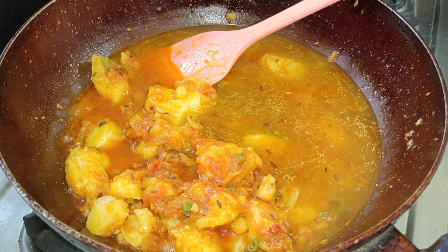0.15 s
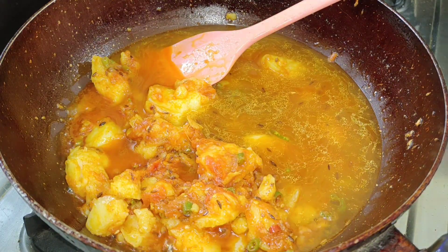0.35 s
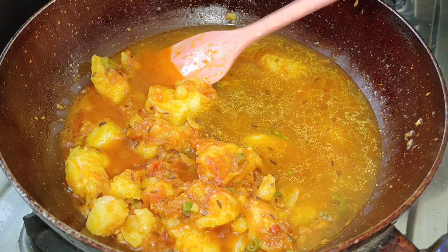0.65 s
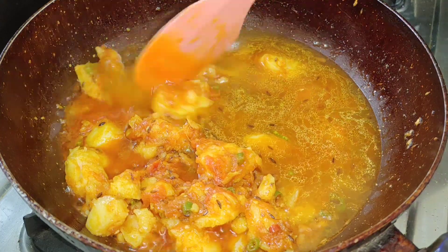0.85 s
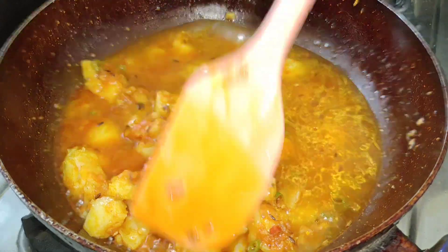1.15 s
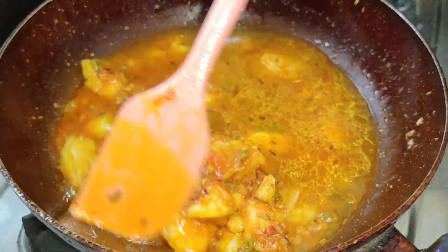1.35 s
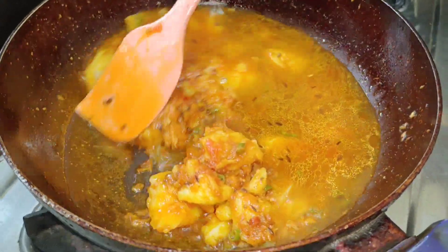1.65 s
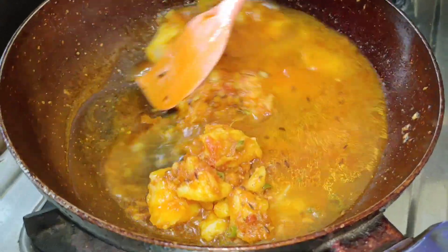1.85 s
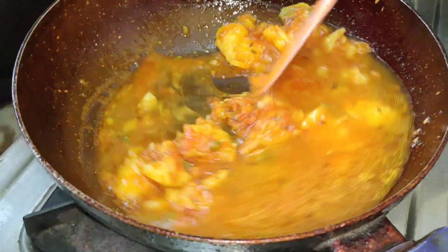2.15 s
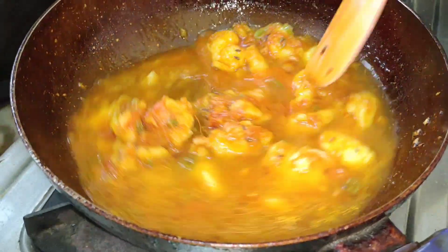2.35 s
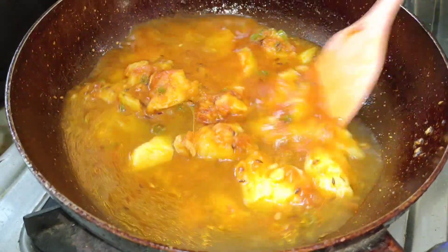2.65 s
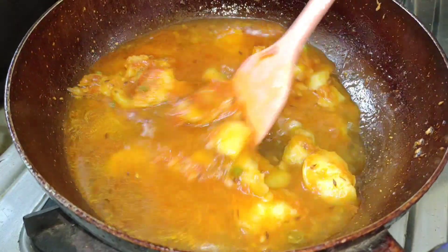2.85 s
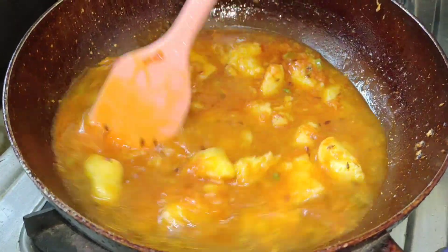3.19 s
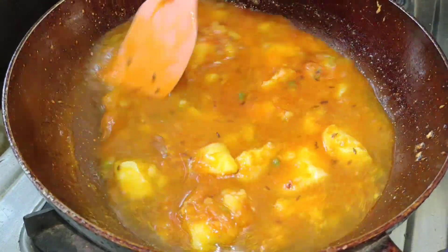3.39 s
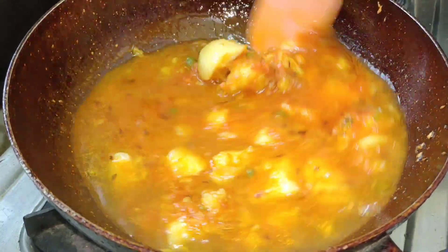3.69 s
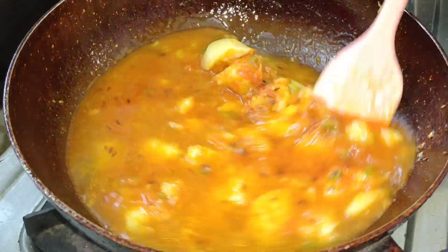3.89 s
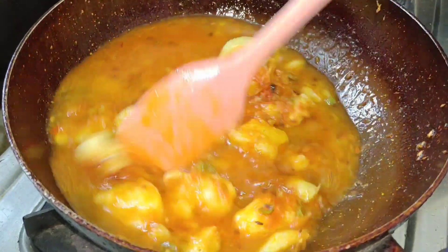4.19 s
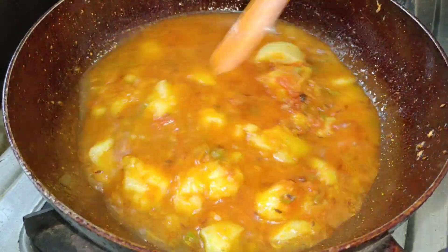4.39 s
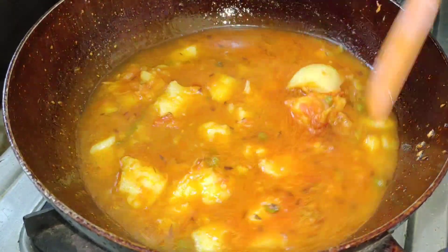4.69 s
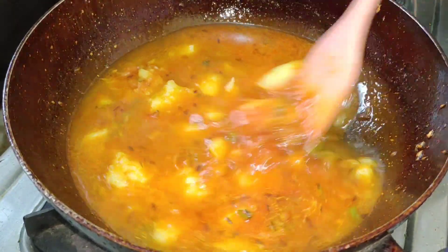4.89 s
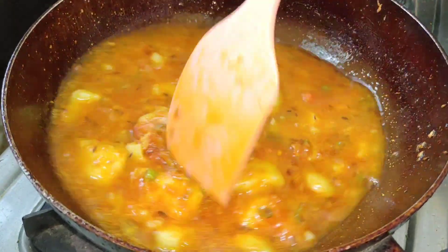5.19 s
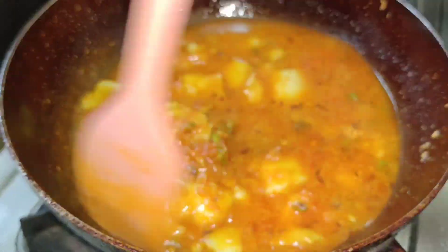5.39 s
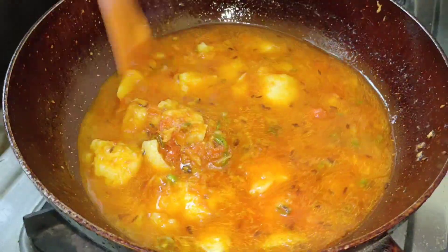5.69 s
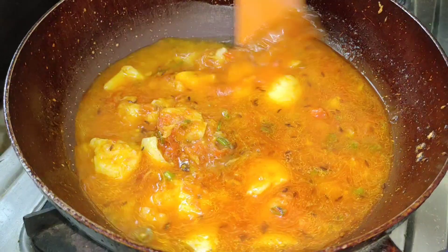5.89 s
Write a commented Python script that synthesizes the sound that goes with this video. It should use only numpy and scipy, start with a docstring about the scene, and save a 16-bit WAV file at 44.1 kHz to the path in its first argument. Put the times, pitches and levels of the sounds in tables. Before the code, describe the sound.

Close stereo sound of thin curry in a steel wok, in a small kitchen with short echoes and a faint steady burner hush. Right at the start a scrape and low thud give way to a cluster of wooden knocks from 0.1 to 0.2 seconds, ringing the bowl briefly. Until about 1.3 seconds the sauce crackles in clumps, with sharp high pops on both sides and small scrapes near 0.7 and 1.0. From 1.35 to 2.2 seconds stirring is strongest: gritty drags, wet sloshes, bright surging hiss, low bowl hums and a light tap near 2.1. It falls away sharply by 2.4 and stays quiet until 3.5. Softer strokes swish around 3.6, 3.9, 4.8 and 5.0, with a burst of high pops near 4.25. After a near-silent dip at 5.2 to 5.5, light scrapes, a faint tap at 5.8 and scattered bubbles close it at 6.

```python
"""A wooden spatula stirs thin curry in a hot steel wok, close to a two-port microphone in a small kitchen.
The blade's knocks ring the wok as fading sines; its scrape and the slosh are gritty noise through the bowl's bands.
Sauce on the hot wall hisses as coloured noise full of tiny bubbles; larger bubbles are short rings with snaps.
Nudges make the bowl hum and the stove thud. Burner and room give a steady hush; wall and room add echoes."""
import sys
import numpy as np
from scipy import signal
from scipy.fft import rfft, irfft, next_fast_len
from scipy.io import wavfile
from scipy.ndimage import uniform_filter1d, map_coordinates

SR = 44100
rng = np.random.default_rng(int(sys.argv[2]) if len(sys.argv) > 2 else 0)


def log_audio(samples):
    """Write samples as a 16-bit WAV file to the path given in sys.argv[1]."""
    # one column per channel
    frames = np.atleast_2d(samples).T
    # limit to full scale, then quantise
    limited = np.clip(frames, -1, 1)
    pcm = np.round(limited * 32767).astype(np.int16)
    wavfile.write(sys.argv[1], SR, pcm)


N = 266364  # length in samples

# Hush of burner and room. Each row: frequency in Hz, relative level per Hz in dB.
AIR_COLOUR = [(25, -46), (50, -10.5), (95, -5.5), (300, -15.5), (1000, -17), (3000, -20.5), (9000, -21.5),
              (13000, -37), (16000, -35)]
# Echoes of bowl wall and room. Each row: frequency in Hz, reflected over direct sound in dB.
ECHO_COLOUR = [(60, -3.5), (300, -5), (1000, -9), (3000, 2), (9000, 3.5), (15000, -1)]
BASS_T60_S, TREBLE_T60_S, CROSSOVER_HZ = 0.092, 0.022, 3000  # time for the echoes to fall by 60 dB
# Where the blade is. Each row: time in seconds, extra path to the left port in ms, left over right in dB.
BLADE_PLACE = [(0, 0.14, -2.5), (1, 0.16, -2.5), (2, 0.15, -1.5), (2.8, 0.21, -1), (3.3, .22, -1),
               (4.5, 0.23, -1), (6.04, 0.24, 0.5)]
TOP_HZ = 15800  # the recorder's band limit

# Sauce on the hot wall. Each row: time in seconds, hiss in dB before a trim, fine spray over hiss in dB.
SIZZLE_LEVELS = [(0, -50.5, -3), (.07, -65, -4), (.12, -54, -3), (.25, -58, -1.5), (.42, -59.5, -2.5),
                 (.48, -61, -1.5), (.65, -59, 0.5), (.69, -46, -3.5), (.74, -55, -5), (.8, -52, -5.5),
                 (.91, -57.5, -4), (1.02, -55.5, 3), (1.08, -53, -8.5), (1.16, -57, -4.5), (1.23, -49, -3),
                 (1.29, -54, -5), (1.4, -48, -6), (1.49, -50, 2.1), (1.56, -43.5, -4.2), (1.63, -50.5, 4.5),
                 (1.72, -52.5, 3), (1.9, -50, 4), (2.05, -44, -1.5), (2.17, -52, 1), (2.29, -54.5, -5),
                 (2.57, -67, 1.5), (2.8, -61.5, 3.5), (2.98, -65.5, 1.5), (3.16, -73.5, -2.5),
                 (3.32, -70, 1), (3.36, -66.5, 5), (3.6, -54.5, 0.5), (3.7, -55.5, -1.5), (3.89, -51, -1.5),
                 (4.02, -56.5, -6.5), (4.19, -64, -2), (4.23, -63.5, 11.5), (4.32, -65, 3.5),
                 (4.44, -70.5, 2.5), (4.53, -67, 2), (4.74, -54, -3), (4.92, -58, -5.5), (5.04, -55, -3),
                 (5.11, -68.5, 1), (5.17, -56, -5), (5.255, -59.5, -8), (5.28, -63, -12), (5.33, -69, -6),
                 (5.37, -79, 1), (5.51, -68.5, -2.5), (5.523, -61.5, -0.5), (5.64, -53.5, -5.5),
                 (5.75, -58, 2.5), (5.91, -65, 6.5), (5.96, -59, 1), (6.04, -66, -1)]
# Colours of the steam, from coarse to fine. Each row: frequency in Hz, relative level per Hz in dB.
HISS_COLOUR = [(1500, -11.5), (2600, -1), (3400, 3.5), (5000, 3.5), (6300, 0), (8000, -43.5)]
SPRAY_COLOUR = [(5000, -21), (6500, -8.5), (8500, -2), (10000, -2.5), (11000, -12), (12500, -37)]
MIST_COLOUR = [(9500, -18.5), (11000, -4.5), (12500, -4.5), (14000, -11), (16000, -7.5)]
STIR_START_S = 1.39  # stirring starts, which ends the first part
MIST_DB, EARLY_MIST_DB = -0.5, -9  # mist over spray, later and in the first part: the top of the hiss is duller at first
RESTING_CLUMPS_DB, CLUMP_RATE = 2.5, 41  # left alone, the sizzle comes in clumps with gaps; knots a second
RESTING_CRACKLE_DB = 1  # left alone, single bubbles stand further out of the steam

# The loudest bubbles. Each row: start in seconds, ring in dB before a trim, ring pitch in Hz,
# left over right in dB before a limit, snap in dB before a trim.
LOUD_POPS = [(0.076, -40, 3720, 0, -62), (0.0907, -27, 9500, 9, -60), (0.114, -26.5, 3760, -2, -56),
             (0.154, -22.5, 5330, 7, -56), (0.1945, -26.5, 5930, 2, -54), (0.2623, -35, 4970, -1, -38.5),
             (0.2655, -44, 6900, 0, -43), (0.3187, -32, 4900, -8, -40), (0.3845, -37, 4800, 8, -41.5),
             (0.4266, -31, 5800, 5, -62), (0.4577, -28, 5040, 6, -52), (0.4872, -35, 3430, 11, -37),
             (0.527, -26, 7660, 1, -60), (0.5546, -21, 8170, -3, -66), (0.5756, -26, 8100, 0, -47),
             (0.6856, -41, 4000, -4.5, -32.5), (0.691, -22, 6000, -3, -47), (0.7133, -26, 5100, -1, -30),
             (0.7731, -26, 3460, -13, -64), (0.785, -36, 3550, -7, -50), (0.793, -30, 3460, -7, -48),
             (0.8035, -23, 3900, 0, -32), (0.8495, -24, 4440, 4, -55), (0.9617, -29, 9350, -10, -65.5),
             (0.9935, -33, 8200, 0, -50), (1.0102, -18.5, 8500, 2, -30.5), (1.0278, -43, 8250, 1, -48),
             (1.0738, -22, 5240, -2, -39), (1.1135, -47, 6140, -9, -42), (1.1595, -37, 5830, -2, -55),
             (1.171, -43, 8500, 0, -56), (1.2003, -20.5, 4370, -3, -42), (1.2196, -35, 4560, 6, -31.5),
             (1.226, -27, 4460, 2, -46), (1.3079, -30.5, 5270, 1, -50), (1.3987, -16.5, 9550, -10.5, -35),
             (1.433, -23, 8450, -2, -48), (1.4825, -19.5, 3270, -2, -50), (1.8118, -20, 5500, -2, -32),
             (1.8475, -20.5, 6930, 3, -32), (1.877, -26, 9500, 0, -28), (1.885, -26, 8950, 3, -35),
             (1.9119, -20, 6300, 3, -43), (1.9864, -45, 4540, 4, -37), (2.0277, -20, 2430, 6.5, -31),
             (2.041, -24, 5860, -4, -31), (2.077, -30, 10000, -4, -41), (2.102, -23, 1800, 5, -44),
             (2.1743, -25, 6470, 1, -31), (2.4239, -25.5, 8700, -13, -53), (2.5421, -27.5, 9700, -11, -48),
             (2.563, -32, 9350, -5, -63), (2.7691, -37, 8300, -7, -40), (3.3568, -32, 7860, -4, -66),
             (3.5843, -34, 8650, -11, -56), (3.8656, -35, 8000, 1, -33), (3.9425, -27, 4280, 3, -46),
             (4.0008, -38.5, 3860, 8, -55), (4.0243, -30, 4260, -1, -38), (4.147, -35, 3980, 1, -47),
             (4.1497, -44, 4070, 2, -35), (4.2105, -31, 8230, -1, -44), (4.2248, -30, 8000, 0, -56),
             (4.232, -36, 8560, -2, -44), (4.2388, -23, 7940, 0, -52), (4.2572, -22, 8000, -1, -40),
             (4.284, -29, 8500, 2, -53), (4.3025, -31, 8300, -8, -42), (4.74, -42, 7500, 0, -55),
             (4.767, -44, 4200, 2, -53), (4.776, -42, 1500, -2, -52), (4.815, -42, 1520, -2, -44),
             (4.8633, -26, 1990, 10, -47), (4.877, -38, 3730, 0, -41), (4.974, -32, 4350, 1, -48),
             (4.9926, -36, 2950, 8, -40), (5.011, -31, 8800, 2, -42), (5.0318, -32, 9000, -11, -39),
             (5.079, -36, 1790, 0, -42), (5.1345, -34, 1960, 3, -42), (5.165, -28, 8300, -2, -35),
             (5.232, -35, 4500, -2, -43), (5.2415, -33, 5040, -9, -54), (5.2512, -31, 7950, 5, -47),
             (5.2704, -42.5, 1410, -3, -46), (5.324, -54, 3800, 5, -51), (5.5223, -34, 5520, -11, -42),
             (5.5408, -46, 3970, 6, -51), (5.543, -42, 8800, -4, -52), (5.5565, -40, 4760, 6, -49),
             (5.5747, -43, 4600, -3, -49), (5.598, -40, 4470, 0, -52), (5.6348, -40, 3300, 2, -36),
             (5.7139, -30, 8950, 2, -50), (5.7389, -30, 8300, 0, -38), (5.754, -26, 8450, 3, -45),
             (5.761, -36, 8600, 5, -44), (5.8105, -33, 1420, -5, -44), (5.9352, -21.5, 9250, -1, -62),
             (5.946, -34.5, 3080, 7, -54), (5.965, -34, 4130, 5, -51), (5.9692, -28, 2360, -8, -35.5),
             (5.981, -34, 2930, -7, -51)]
SMALL_RING_DB, SMALL_SNAP_DB, SMALL_HZ = 16, -6, 6210  # smaller bubbles: offsets from hiss to ring and snap; pitch
FOLLOW_S, FOLLOW_DB = 0.011, -10  # a burst sets off its neighbours: mean wait past 2 ms, usual level under the first

# The wok rocks on the stove. Each row: peak time in seconds, dying away to 1/e in seconds,
# bowl hum in dB, stove thud in dB.
NUDGE_LIST = [(0, 0.028, -69, -52), (.1, 0.068, -66, -55.5), (.17, 0.057, -59.5, -59.5),
              (.8, 0.073, -65.5, -98), (1.1, 0.19, -70.5, -83), (1.2, 0.067, -67, -80),
              (1.36, 0.062, -59.5, -75), (1.471, 0.083, -60.5, -69), (1.55, 0.045, -61, -61),
              (1.61, 0.016, -59, -81), (1.72, 0.05, -66, -86), (1.79, 0.088, -64.5, -93),
              (1.97, 0.042, -68, -96), (2.03, 0.033, -55, -88), (2.1, 0.034, -56, -94),
              (2.5, 0.11, -72, -82), (2.6, 0.045, -71.5, -99), (3.27, 0.045, -82, -96),
              (3.315, 0.071, -67, -86), (3.47, 0.039, -103, -92), (3.7, 0.12, -101, -75),
              (3.84, 0.026, -99, -68), (4.02, 0.038, -94, -75), (4.25, 0.11, -90, -81),
              (4.48, 0.16, -82, -83), (4.75, 0.08, -86, -79), (4.98, 0.14, -74, -69),
              (5.5, 0.023, -88, -71.5), (5.6, 0.044, -96, -71)]
NUDGE_RISE_S = 0.027
REST_HUM_DB, REST_THUD_DB, SWAY_DB, SWAY_WAVERS_DB = -85, -85.5, -94.5, 4
# Resonances, all squared later: lowest bending of the bowl, stove top, stove on its feet.
# Each row: centre in Hz, width in Hz before squaring, level in dB before squaring.
BOWL_HUM = [(302, 18.6, 2.5), (397.5, 25, 3.5), (235, 82, -0.5)]
STOVE_THUD = [(106.9, 10.5, 7), (177, 54, 2.5)]
STOVE_SWAY = [(73.8, 21, 0)]
# Sauce rolling over. Each row: frequency in Hz, relative level per Hz in dB.
GURGLE_COLOUR = [(70, -40), (140, -5.5), (220, 0), (330, 3.5), (450, 3), (560, -13), (900, -38)]
GURGLE_DB, GURGLE_LUMPS_DB = -7, 2.5  # level over the bowl hum; depth of its lumps

# Blade in the bowl. Each row: time in seconds, scrape in dB before a trim, slosh over scrape in dB.
BLADE_LEVELS = [(0, -47.5, -3), (.06, -60.5, -8), (.088, -59, -5), (.092, -52, 8), (.15, -45.5, 4),
                (.24, -54, -1.5), (.42, -59.5, -6), (.48, -55.5, -3), (.64, -57, -3.5), (.7, -51, -6.5),
                (.76, -58, -2.5), (.99, -56.5, -4.5), (1.04, -49.5, -11), (1.16, -57.5, -0.5),
                (1.31, -52, -7), (1.345, -56, 2), (1.41, -46, 0), (1.47, -45, -10.5), (1.59, -52, -1.5),
                (1.74, -51.5, -10.5), (1.8, -46.5, -9.5), (1.93, -52, -8.5), (2.03, -44.5, -10.5),
                (2.085, -47.5, -3), (2.16, -42.5, -24), (2.22, -52.5, -7.5), (2.36, -59, -8),
                (2.45, -65.5, -2), (2.7, -63, -11), (2.83, -59, -7), (2.92, -67.5, -6), (3.28, -71.5, -4.5),
                (3.46, -64, -7), (3.6, -50.5, -9.5), (3.66, -66.5, -3), (3.87, -50, -10.5),
                (4.02, -62, -5.5), (4.22, -75, -6), (4.42, -67.5, -10), (4.47, -63, -2), (4.61, -58.5, -10),
                (4.79, -52.5, -8.5), (4.93, -58.5, -11), (5.02, -47.5, -13), (5.12, -73, 1),
                (5.22, -81, -6), (5.27, -65, -17), (5.35, -80, -20), (5.51, -71.5, -4), (5.57, -63, -9),
                (5.63, -59, -16), (5.68, -55.5, -3.5), (5.75, -52.5, -6), (5.79, -59.5, -3),
                (5.84, -53, -18), (5.91, -64, -34), (5.945, -52.5, -15), (5.97, -50, -25),
                (5.995, -52, -18), (6.04, -56, -32)]
# Bowl under the wet blade: first push along the near wall, water still apart, water mixed in.
# Each row: centre in Hz, width in Hz before sharpening, level in dB before sharpening.
DRAG_NEAR_WALL = [(1175, 67, 2), (1565, 220, 1.5), (1960, 130, 1.2), (2316, 270, 1)]
DRAG_APART = [(1180, 220, -7), (1423, 140, -1.5), (1650, 130, 1.5), (1906, 91, 2), (2400, 220, -2.3)]
DRAG_BLENDED = [(1190, 160, -6.5), (1395, 114, 4.5), (1586, 250, 1.4), (1970, 380, 2), (2280, 330, 1),
                (3020, 310, -8)]
# Bowl under moving sauce: water still apart, water mixed in.
# Each row: centre in Hz, width in Hz before squaring, level in dB before squaring.
SLOSH_APART = [(562, 147, -0.5), (716.5, 78, 4), (821, 88, 2.5), (978, 42, 1.4)]
SLOSH_BLENDED = [(620, 174, -1.2), (809, 107, 2.7), (1003, 116, -1.4)]
DRAG_SHARPNESS = 1.06  # power of the bowl's response: deeper valleys between its bands
TURNING_S = (1.58, 1.59)  # from and to: the blade leaves the near wall and turns round the bowl
MIXING_S = (2.93, 3)  # from and to: the water blends into the curry

# Ringing tones of the steel bowl. Each row: pitch in Hz, level in dB before other factors,
# time to fall by 60 dB in seconds.
WOK_MODES = [(106, -31, 0.33), (294, -11.5, 0.25), (435, -18, 0.57), (584, -20, 0.34), (694, -12, 0.093),
             (722, -6, 0.2), (846, 2, 0.1), (903, -1, 0.29), (1050, -7, 0.24), (1097, -14, 0.28),
             (1220, -17, 0.4), (1350, -17, 0.22), (1423, -16, 0.3), (1654, -4.5, 0.4), (1950, -17, 0.19),
             (2090, -18.5, 0.3), (2060, -33, 0.13), (3340, -9, 0.13), (3414, -20, 0.15),
             (3750, -12.5, 0.084), (5100, -25.5, 0.15), (5900, -12.5, 0.18), (7100, -32, 0.12),
             (8250, -19.5, 0.078), (9660, -12.5, 0.23)]
# Blade on steel. Each row: start in seconds, level in dB before a trim, left over right in dB.
KNOCK_LIST = [(0.090, -19.5, 6), (0.104, -21, 1), (0.132, -27, -5), (0.152, -34, 5), (0.199, -38.5, 9),
              (0.318, -51, 1), (0.487, -51, 4), (0.687, -55, 13), (1.344, -37.5, -1), (2.102, -40.5, 5),
              (5.2715, -65, -3), (5.294, -78, -3), (5.455, -61, 0), (5.806, -44, 2)]
# Sauce in the ringing bowl: knots a second, depth in level and phase; it swallows the tail within SOAK_S.
WAVER_RATE, WAVER_DB, WAVER_RAD, SOAK_S = 63, 1.5, 0.97, 0.12


def amp(db):
    """Turns dB into gain."""
    return 10 ** (np.asarray(db) / 20)


def unit(x):
    """Scales a sound to an rms of 1."""
    return x / np.sqrt(np.mean(x ** 2) + 1e-20)


def along(points, hz):
    """Reads a curve of (Hz, value) points on a log frequency axis."""
    f, v = np.transpose(points)
    return np.interp(np.log(hz + 1), np.log(f + 1), v)


def curves(rows):
    """Draws one value per sample for each column after the time."""
    s, *cols = np.transpose(rows)
    return [np.interp(np.arange(N) / SR, s, c) for c in cols]


def wobble(rate):
    """Makes a smooth random curve with rate knots a second."""
    knots = rng.standard_normal(int(N * rate / SR) + 4)
    return map_coordinates(knots, [np.arange(N) * rate / SR])


def filtered(x, response):
    """Passes x through a response given as a function of frequency."""
    m = next_fast_len(N + SR // 2)
    return irfft(rfft(x, m) * response(np.fft.rfftfreq(m, 1 / SR)), m)[..., :N]


def body(modes):
    """Response of a solid body: a sum of (Hz, width, dB) resonances with alternating signs."""
    def response(f):
        total = 0
        for k, (centre, width, db) in enumerate(modes):
            damping = 1j * f * width
            total = total + (-1) ** k * amp(db) * damping / (centre * centre - f * f + damping)
        return total
    return response


def powered(modes, power):
    """Response of a body with its strength raised to a power, which deepens the valleys between bands."""
    def response(f):
        plain = body(modes)(f)
        return plain * abs(plain) ** (power - 1)
    return response


def steep(modes):
    """Response of a body applied twice, so its bands fall off faster."""
    return lambda f: body(modes)(f) ** 2


def colour(points):
    """Response that follows a curve of (Hz, dB) points."""
    return lambda f: amp(along(points, f))


def gritty(patchy_db, spread):
    """Noise in patches of shifting colour; more spread makes the two ports differ more."""
    z = signal.stft(rng.standard_normal((2, N)), nperseg=512)[2]
    field = rng.standard_normal(z.shape[1:])
    field = uniform_filter1d(field, size=5, axis=0)  # smooth over frequency
    field = uniform_filter1d(field, size=6, axis=1)  # smooth over time
    patchy = signal.istft(z * amp(patchy_db * unit(field)), nperseg=512)[1]
    mid, side = unit(patchy[:, :N])
    return np.array([mid + spread * side, mid - spread * side]) / np.hypot(1, spread)


def placed(s, waves):
    """Adds up short waves, one per row, starting at the times s."""
    k = np.arange(waves.shape[1])
    at = (np.round(s * SR).astype(int)[:, None] + k).ravel()
    return np.bincount(at, waves.ravel(), N + len(k))[:N]


def grains(s, hz, size, cycles, rise):
    """Short sines at times s; rise and fade to 1/e are counted in cycles."""
    phase = hz[:, None] * np.arange(200) / SR
    envelope = np.exp(-phase / cycles) * (1 - np.exp(-phase / rise))
    return placed(s, size[:, None] * np.sin(2 * np.pi * phase) * envelope)


def air():
    """The steady hush of burner and room: coloured noise, alike at both ports in the bass only."""
    mid, other = filtered(rng.standard_normal((2, N)), colour(AIR_COLOUR))
    side = filtered(other, lambda f: f * f / (f * f + 300 ** 2))
    return amp(-71.5) * unit(np.array([mid + side, mid - side]))


def echo_tail(noise, t, t60):
    """Spectrum of a noise echo that dies away by 60 dB in t60 seconds."""
    decay = amp(-60 * t / t60)
    return rfft(noise * decay / np.linalg.norm(decay), 2 * len(t))


def kitchen(x):
    """Echoes of bowl wall and room: fading noise, different at each port and new for each short piece of x."""
    hop = 4096
    count = N // hop + 2
    padded = np.pad(x, ((0, 0), (hop, (count + 1) * hop - N - hop)))
    fade = np.sin(np.pi * np.arange(2 * hop) / (2 * hop))
    pieces = np.array([padded[:, k * hop:(k + 2) * hop] for k in range(count)]) * fade
    t, hz = np.arange(2 * hop) / SR, np.fft.rfftfreq(4 * hop, 1 / SR)
    noise = rng.standard_normal(pieces.shape)
    bass, treble = (echo_tail(noise, t, t60) for t60 in (BASS_T60_S, TREBLE_T60_S))
    apart = hz / (hz + 200)  # long waves reach both ports alike
    bass = (1 - apart) * bass[:, :1] + apart * bass
    low = 1 / (1 + (hz / CROSSOVER_HZ) ** 2)
    echo = (np.sqrt(low) * bass + np.sqrt(1 - low) * treble) * amp(along(ECHO_COLOUR, hz))
    wet = irfft(rfft(pieces, 2 * len(t)) * echo)
    out = np.zeros((2, (count + 4) * hop))
    for k, piece in enumerate(wet):
        out[:, k * hop:(k + 4) * hop] += piece
    return out[:, hop:hop + N]


def ports(x):
    """Sound from the wok travels further to the left port, so it arrives there later."""
    lag_ms, pan_db = curves(BLADE_PLACE)
    left = map_coordinates(x[0], [np.arange(N) - lag_ms * SR / 1000], order=5)
    return np.array([left * amp(pan_db / 2), x[1] * amp(-pan_db / 2)])


def crackle(count, centre_hz, spread, cycles, size_db):
    """Many tiny bursting bubbles as short sines, a few much larger than the rest."""
    u, g = rng.random((count, 2)), rng.standard_normal(count)
    hz = np.clip(centre_hz * np.exp(spread * g), 500, SR / 3)
    size = amp(-size_db * np.log(u[:, 1] + 0.0018))
    return unit(grains(u[:, 0] * N / SR, hz, size, cycles, rise=0.23))


def sauce(slips):
    """Sauce pushed up the hot wall: steam noise with bubbles in it, from coarse hiss to fine mist."""
    hiss_db, fine_db = curves(SIZZLE_LEVELS)
    early = np.arange(N) / SR < STIR_START_S
    mist_db = np.where(early, EARLY_MIST_DB, MIST_DB)
    clumps = unit(amp(RESTING_CLUMPS_DB * early * wobble(CLUMP_RATE)))

    steam = gritty(patchy_db=2.0, spread=0.4) * amp(2.0 * slips)
    bubbles = crackle(count=4000, centre_hz=3840, spread=0.39, cycles=0.84, size_db=3.0)
    coarse = steam + 0.83 * amp(RESTING_CRACKLE_DB * early) * bubbles

    fine_steam = gritty(patchy_db=1.2, spread=1.0) * amp(1.7 * slips)
    fine_bubbles = crackle(count=6000, centre_hz=9330, spread=0.48, cycles=0.53, size_db=3.0)
    fine = fine_steam + 1.13 * fine_bubbles

    hiss = unit(filtered(coarse, colour(HISS_COLOUR)))
    mist = unit(filtered(fine, colour(MIST_COLOUR)))
    spray = unit(filtered(fine, colour(SPRAY_COLOUR))) + amp(mist_db) * mist
    return amp(hiss_db - 5.0) * clumps * (hiss + amp(fine_db) * spray)


def small_pops(count):
    """Smaller bubbles at random moments, following the loudness of the hiss; columns as in LOUD_POPS."""
    s = rng.random(count) * N / SR
    a, b, c, d = rng.standard_normal((count, 4)).T
    hiss_db = curves(SIZZLE_LEVELS)[0][(s * SR).astype(int)]
    hz = np.clip(SMALL_HZ * np.exp(0.435 * b), 2000, 11000)
    ring_db = hiss_db + SMALL_RING_DB + 1.9 * a
    snap_db = hiss_db + SMALL_SNAP_DB + 2.2 * d
    return np.transpose([s, ring_db, hz, 4 * c, snap_db])


def clusters(rows):
    """Each burst sets off three neighbours of like pitch, mostly weaker."""
    after = np.repeat(rows, 3, axis=0)
    u = rng.random(len(after))
    a, b, c = rng.standard_normal((len(after), 3)).T
    s, db, hz, pan_db, snap_db = after.T
    s = np.minimum(s + 0.002 - FOLLOW_S * np.log(1 - u), (N - 1) / SR)
    change_db = FOLLOW_DB + 3 * a
    neighbours = [s, db + change_db, hz * np.exp(0.055 * b), pan_db + 2 * c, snap_db + change_db]
    return np.vstack([rows, np.transpose(neighbours)])


def pops():
    """Larger bubbles, each from its own side: a short ring and a wide snap that also ping the upper steel modes."""
    s, db, hz, pan_db, snap_db = clusters(np.vstack([LOUD_POPS, small_pops(count=260)])).T
    share = amp(np.outer([.5, -.5], np.clip(pan_db, -8, 8)))  # gain at each port
    k = np.arange(96)
    snap = rng.standard_normal((len(s), len(k))) * np.exp(-((k / SR - .0007) / 0.00017) ** 2)
    snap = snap / np.linalg.norm(snap, axis=1, keepdims=True)
    snaps = np.array([placed(s, snap * (g * amp(snap_db + 18.5))[:, None]) for g in share])
    rings = np.array([grains(s, hz, g * amp(db + 5.0), cycles=3.23, rise=6.23) for g in share])
    burst = rings + filtered(snaps, lambda f: (f / (f + 1300)) ** 2 / (1 + (f / 9800) ** 6))
    # a mode that rings longer has a narrower band
    steel = body([(c, np.log(1000) / (np.pi * t60), level) for c, level, t60 in WOK_MODES])
    ping = filtered(burst.mean(axis=0), lambda f: steel(f) * (f > 2100))
    return burst + amp(23.5) * ping


def rocking():
    """Gains of hum and thud: every nudge swells quickly and dies away, over a resting level."""
    s, fall_s, *db = np.transpose(NUDGE_LIST)
    late = np.arange(N) / SR - s[:, None]
    swell = np.exp(-np.where(late < 0, (late / NUDGE_RISE_S) ** 2, late / fall_s[:, None]))
    return amp(db) @ swell + amp([[REST_HUM_DB], [REST_THUD_DB]])


def hum_and_thud():
    """The rocking wok: noise shakes the bowl's lowest modes and the stove, with a gurgle of rolling sauce."""
    shake = rng.standard_normal(N) * amp(1.4 * wobble(30))
    thud, sway = (unit(filtered(shake, steep(modes))) for modes in (STOVE_THUD, STOVE_SWAY))
    hum = unit(filtered(gritty(patchy_db=4.5, spread=0.44), steep(BOWL_HUM)))
    rolling = gritty(patchy_db=2.5, spread=0.3) * amp(GURGLE_LUMPS_DB * wobble(40))
    gurgle = unit(filtered(rolling, colour(GURGLE_COLOUR)))
    hum_gain, thud_gain = rocking()
    sway_gain = amp(SWAY_DB + SWAY_WAVERS_DB * wobble(5.5))
    return hum_gain * (hum + amp(GURGLE_DB) * gurgle) + thud_gain * thud + sway_gain * sway


def blending(x, stages, changes):
    """Passes x through the bowl, whose response crossfades from stage to stage over the spans of change."""
    out = unit(filtered(x, stages[0]))
    for stage, span in zip(stages[1:], changes):
        turn = np.interp(np.arange(N) / SR, span, [0, np.pi / 2])
        out = np.cos(turn) * out + np.sin(turn) * unit(filtered(x, stage))
    return out


def scrape(slips):
    """The blade drags on the steel and pushes sauce: slipping noise through the bands of the bowl."""
    scrape_db, wet_db = curves(BLADE_LEVELS)
    drag_stages = [powered(modes, DRAG_SHARPNESS) for modes in (DRAG_NEAR_WALL, DRAG_APART, DRAG_BLENDED)]
    rubbing = gritty(patchy_db=1.83, spread=0.72) * amp(3.1 * slips)
    drag = blending(rubbing, drag_stages, [TURNING_S, MIXING_S])
    pushing = gritty(patchy_db=3.0, spread=0.062) * amp(3.0 * slips)
    slosh = blending(pushing, [steep(SLOSH_APART), steep(SLOSH_BLENDED)], [MIXING_S])
    return amp(scrape_db - 5.5) * (drag + amp(wet_db) * slosh)


def knocks():
    """Each blow rings the bowl's modes at new strengths; sauce makes them waver and swallows the tail."""
    out, t = np.zeros((2, N + SR)), np.arange(SR // 2) / SR
    hz, level, t60 = np.transpose(WOK_MODES)[:, :, None, None]
    count = len(WOK_MODES)
    place = np.clip(t * WAVER_RATE, 0, 62)
    k, part = place.astype(int), np.sin(np.pi / 2 * (place % 1)) ** 2
    soft_wood = 1 / np.hypot(1, hz / 3600)  # wood is too soft for the top modes
    shape = (1 - np.exp(-t / 0.00067)) * np.exp(-(t / SOAK_S) ** 2 / 2)
    for s, db, pan_db in KNOCK_LIST:
        strength, start = rng.standard_normal((2, count, 1, 1))
        port = rng.standard_normal((count, 1, 1)) * np.array([[1], [-1]])
        knots = rng.standard_normal((2, count, 2, 64))  # each mode wavers in its own way at each port
        size, phase = knots[..., k] * (1 - part) + knots[..., k + 1] * part
        size_db = level + 2.6 * strength + WAVER_DB * size - 60 * t / t60
        drift = WAVER_RAD * phase * np.minimum(t * WAVER_RATE, 1)
        angle = 2 * np.pi * hz * t + 0.36 * start + 0.43 * port + drift
        ring = (amp(size_db) * soft_wood * np.sin(angle)).sum(axis=0)
        gain = amp(db - 15.0 + pan_db * np.array([[.5], [-.5]]))
        out[:, round(s * SR):][:, :len(t)] += gain * ring * shape
    return out[:, :N]


def scene():
    """Everything in the wok, direct and reflected, over the hush; the open-surface bubbles echo least."""
    # the blade catches and lets go, from ticks to lumps
    slips = wobble(700) + 0.73 * wobble(120) + 0.33 * wobble(30)
    wok = sauce(slips) + hum_and_thud() + scrape(slips) + knocks()
    bubbles = pops()
    reflected = kitchen(wok + amp(-9) * bubbles)
    return ports(wok + bubbles + reflected) + air()


def record(dry):
    """The microphone loses the deepest bass; the recorder keeps nothing above its band limit."""
    return filtered(dry, lambda hz: (hz < TOP_HZ) / np.sqrt(1 + (50 / (hz + 1)) ** 6))


dry = scene()
out = record(dry)
log_audio(out)
```